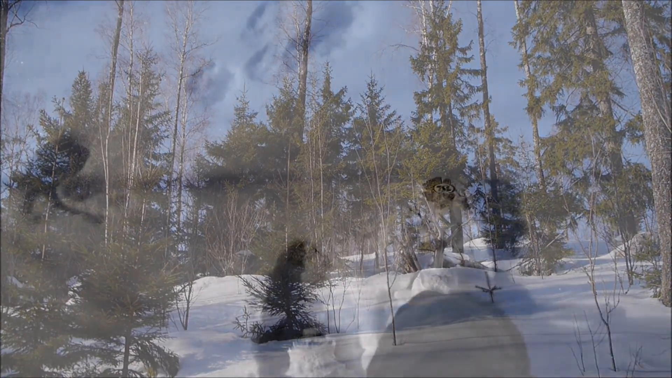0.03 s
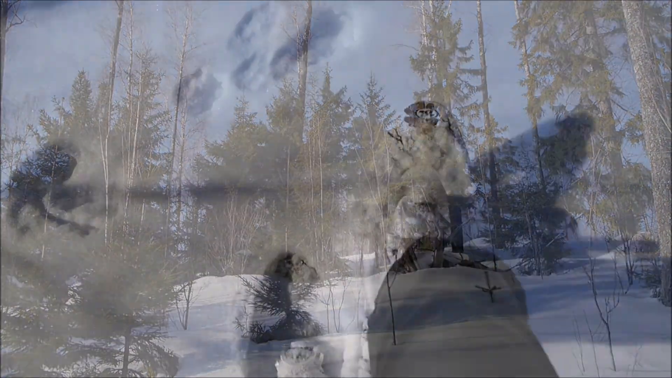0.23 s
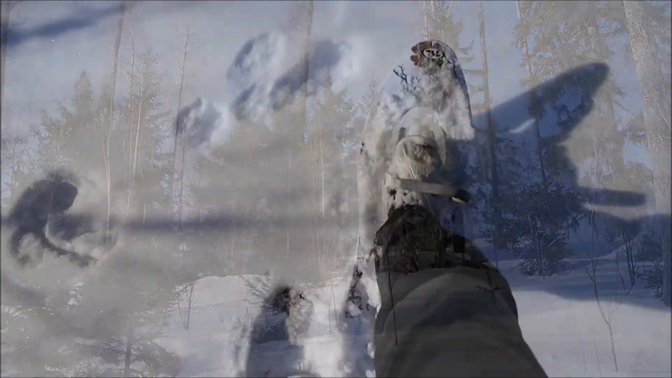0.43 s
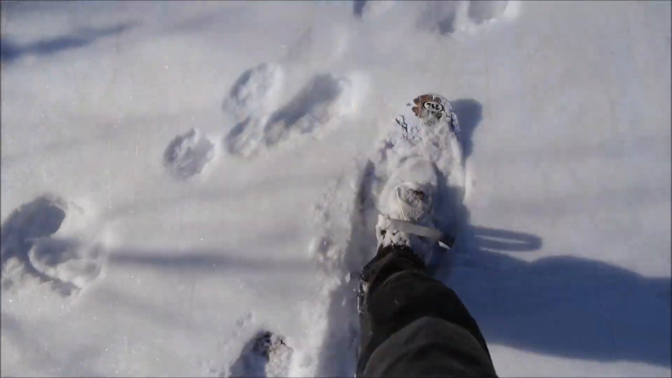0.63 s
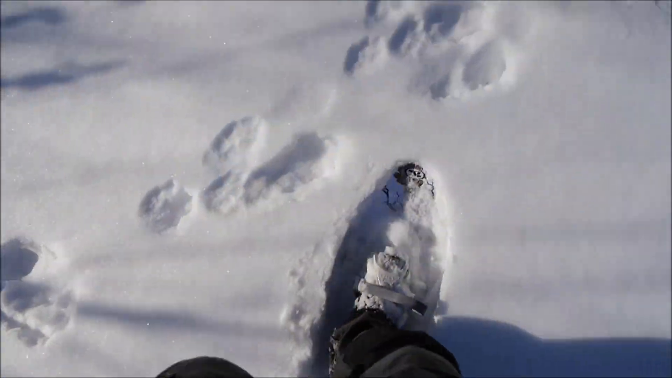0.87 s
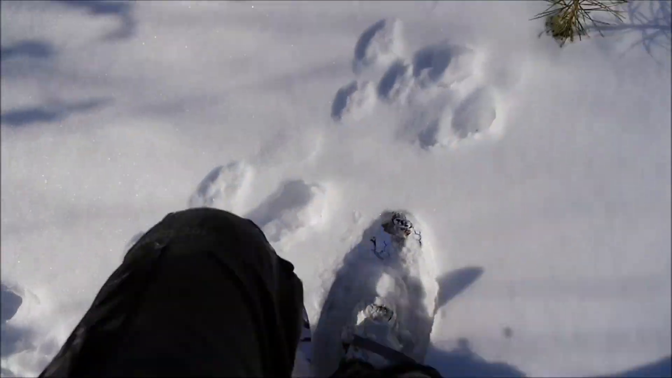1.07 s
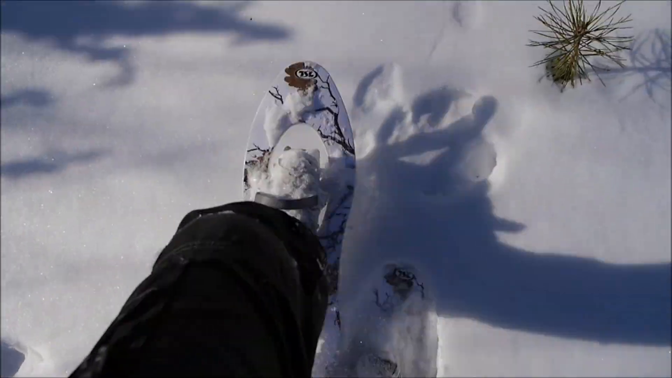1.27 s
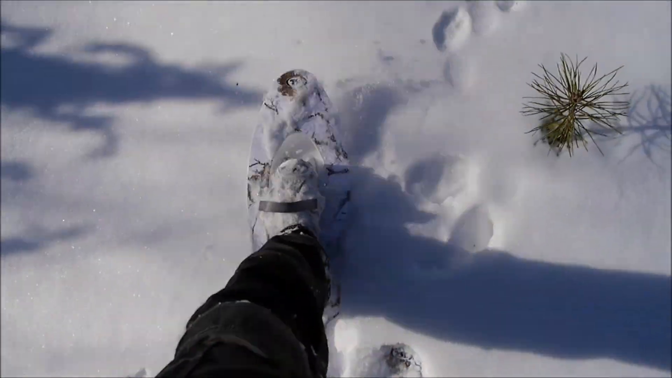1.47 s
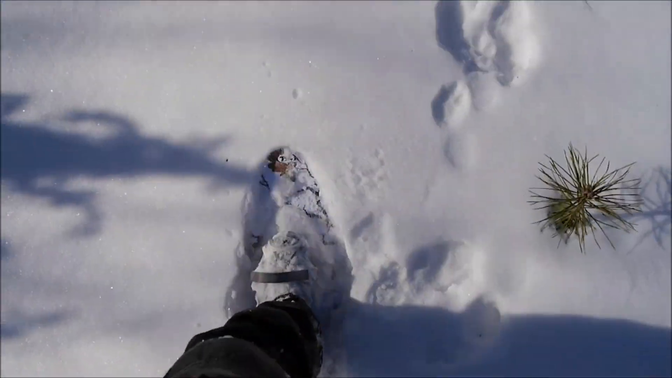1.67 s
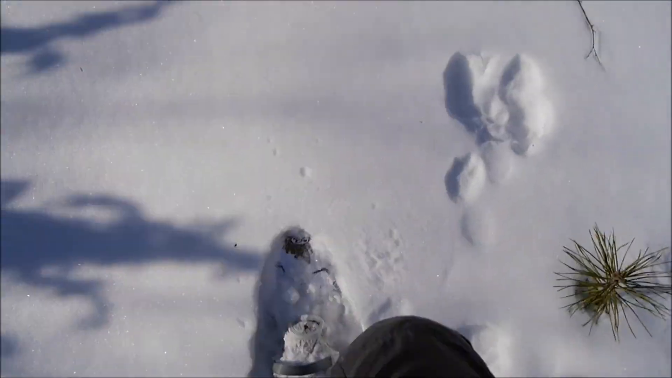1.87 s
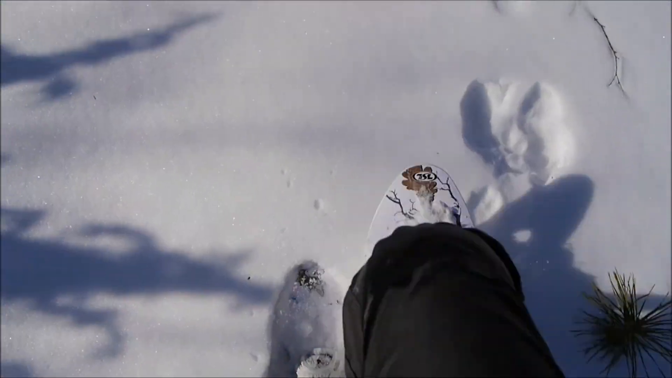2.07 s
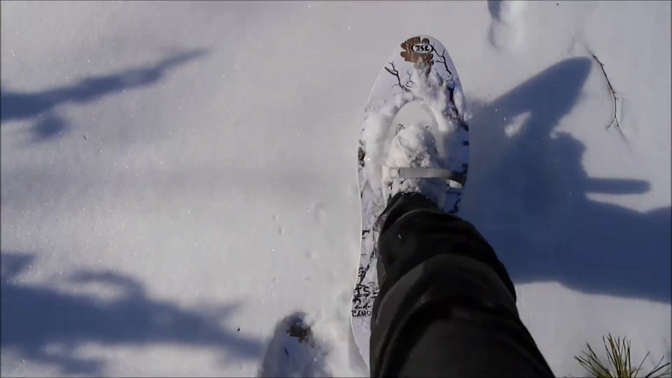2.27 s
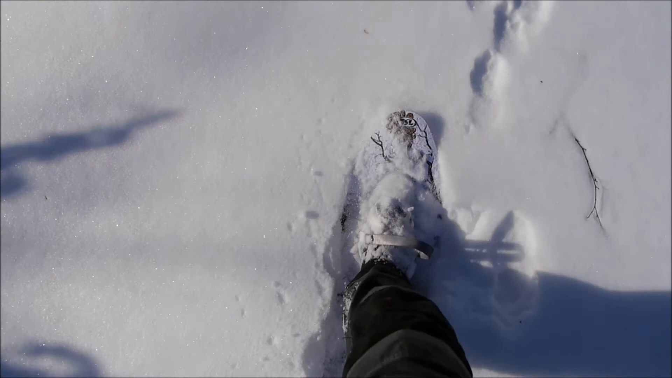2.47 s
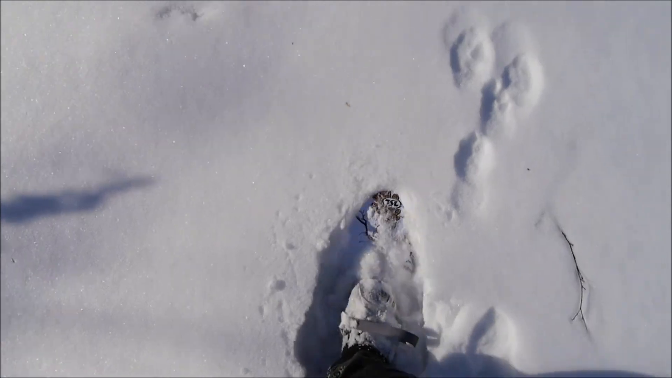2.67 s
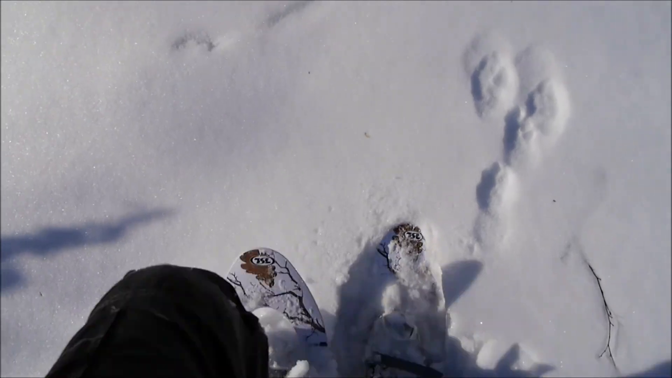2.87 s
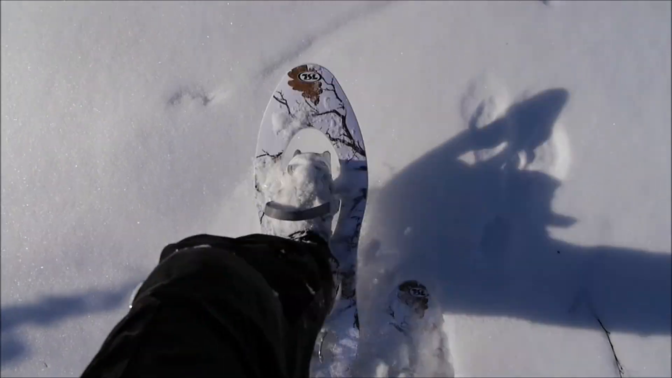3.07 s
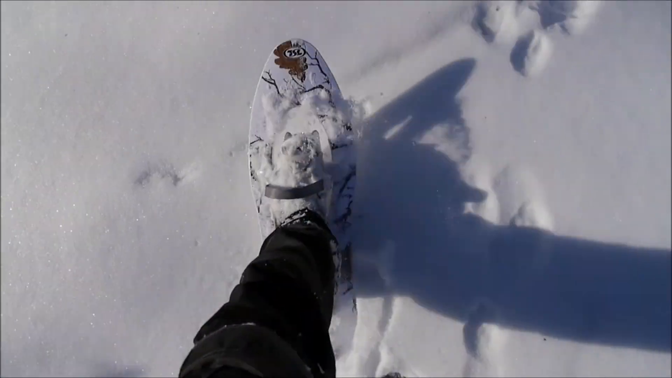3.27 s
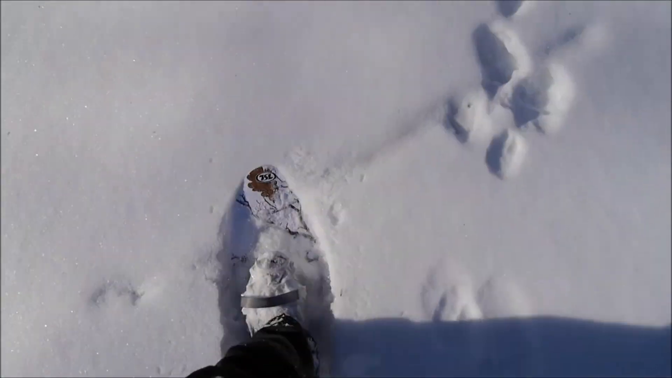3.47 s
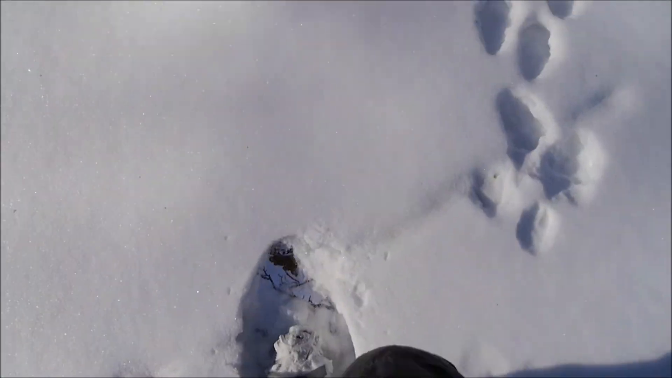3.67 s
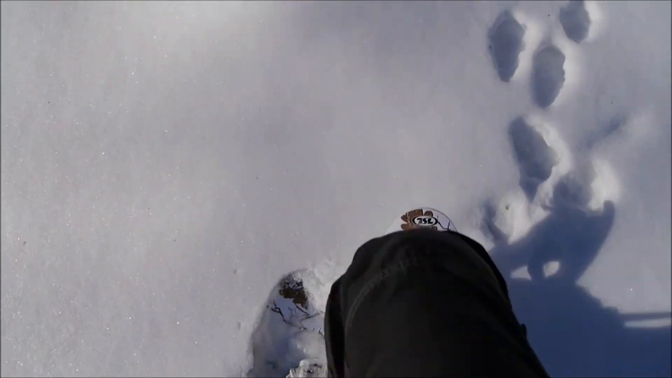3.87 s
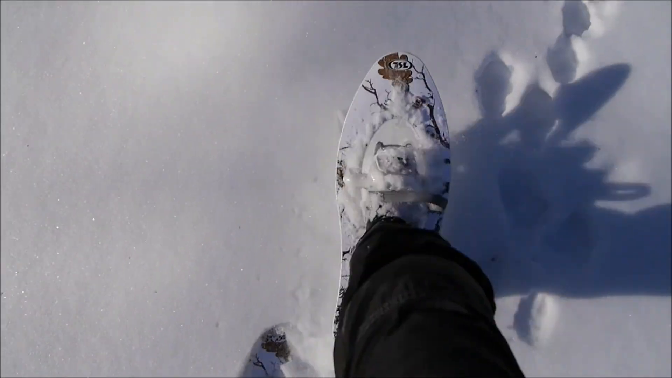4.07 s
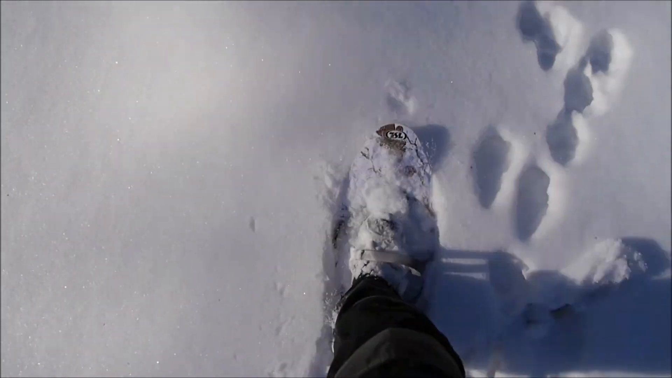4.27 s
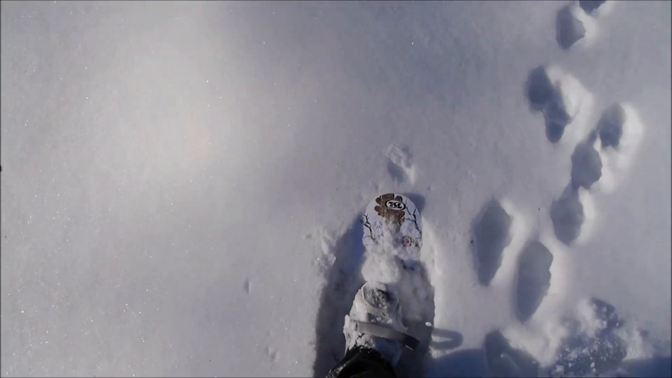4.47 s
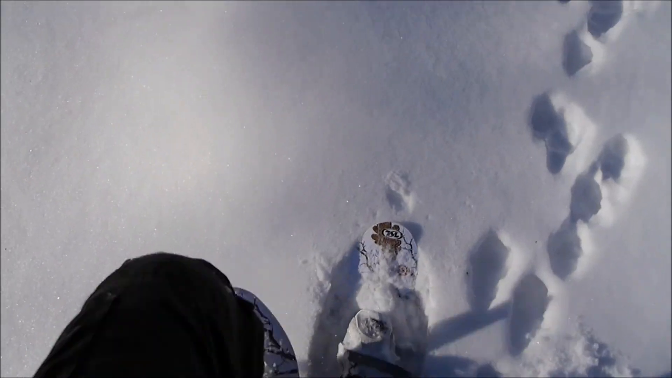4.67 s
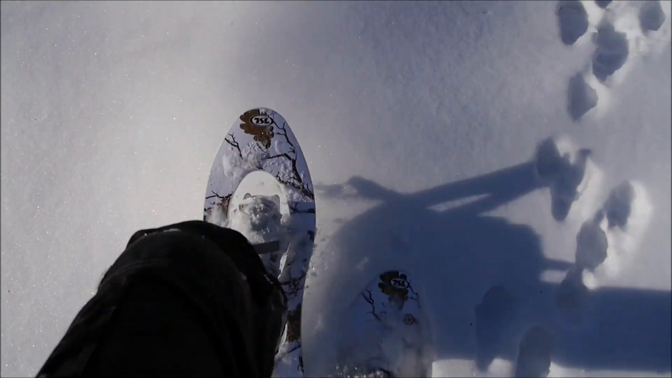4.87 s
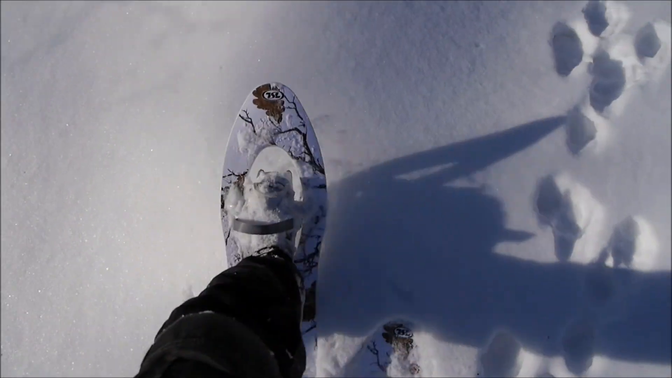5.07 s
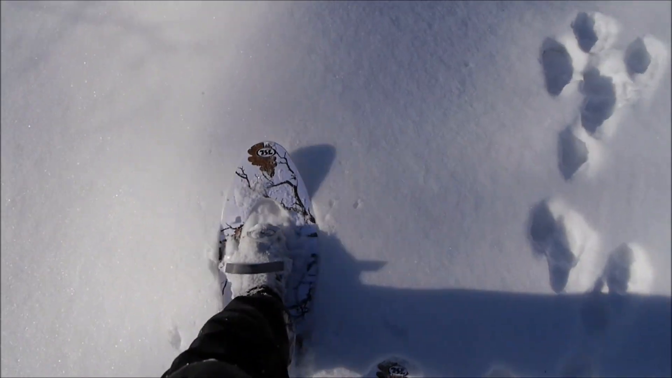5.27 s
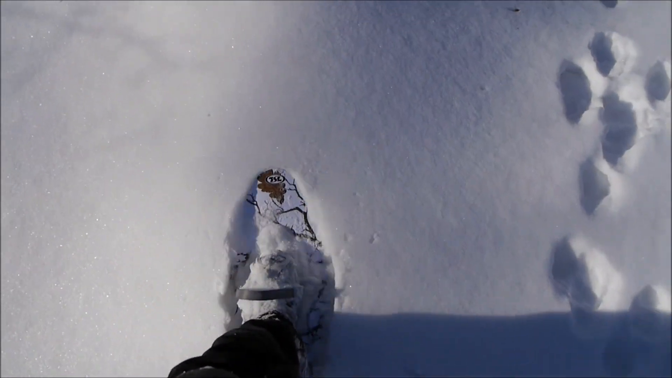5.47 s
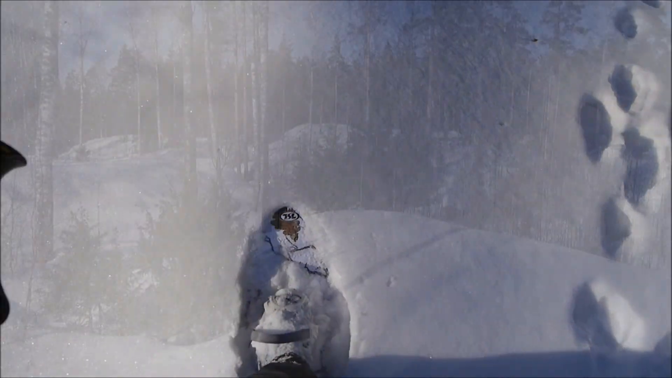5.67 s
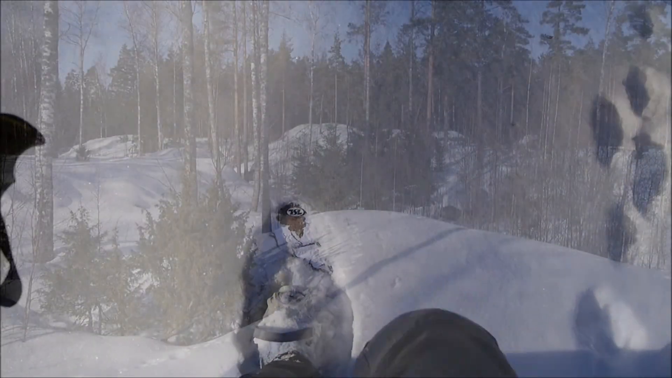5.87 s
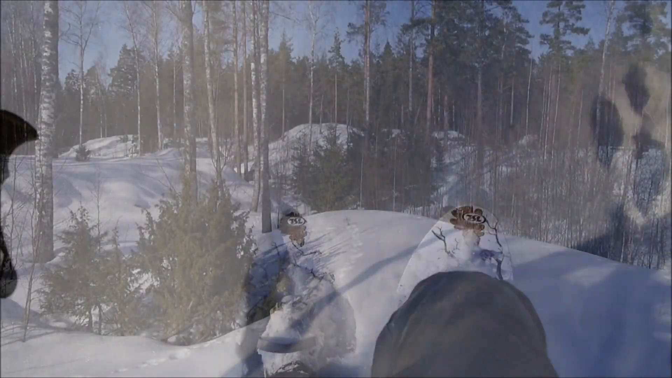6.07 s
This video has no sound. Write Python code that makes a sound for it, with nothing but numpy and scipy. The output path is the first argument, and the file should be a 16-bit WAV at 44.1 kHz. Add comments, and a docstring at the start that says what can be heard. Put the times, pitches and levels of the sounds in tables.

```python
"""Snowshoes walk through cold powder, close by, in a still forest.
Each stride drags the frame through the crust, throws powder, lands and packs the snow with a squeaky
crunch: dense clicks of breaking ice bonds. Pockets of snow give way with dull thumps, plastic decks and
bindings knock, bits of crust snap, straps and cloth rub. Trunks scatter a faint echo; behind it are
an even background hiss and a few low puffs of air stirred by the walk."""
import sys
import numpy as np
from scipy import signal
from scipy.fft import rfft, irfft
from scipy.io import wavfile
from scipy.ndimage import uniform_filter1d

SR = 44100
rng = np.random.default_rng(int(sys.argv[2]) if len(sys.argv) > 2 else 0)


def dump_mix(stems):
    """Bounce the given channels to the path in sys.argv[1] as a 16-bit WAV at rate SR."""
    frames = np.atleast_2d(stems).T  # one column per channel
    limited = np.clip(frames, -1, 1)  # hard clip at full scale
    pcm = np.round(limited * 32767).astype(np.int16)
    wavfile.write(sys.argv[1], SR, pcm)


N = 269451
TIME = np.arange(N) / SR
HZ = np.fft.rfftfreq(N, 1 / SR)


def amp(db):
    """Decibels to gain."""
    return 10 ** (np.asarray(db) / 20)


def unit_rms(x):
    """Scales to rms 1."""
    return x / np.sqrt(np.mean(x ** 2) + 1e-20)


def curve_at(points, hz):
    """Interpolates on a log-frequency axis."""
    f, value = np.transpose(points)
    return np.interp(np.log(hz + 1), np.log(f + 1), value)


def add(mix, start_s, sound):
    """Mixes a sound in at start_s."""
    part = mix[..., round(start_s * SR):][..., :sound.shape[-1]]
    part += sound[..., :part.shape[-1]]


def colour(x, spectrum, tilt_db_oct=0, size=2048):
    """Minimum-phase filter of unit energy: each click gets a sharp front and a short ring."""
    hz = abs(np.fft.fftfreq(size, 1 / SR))
    log_gain = np.log(amp(curve_at(spectrum, hz) + tilt_db_oct * np.log2(1 + hz / 500)))
    ring = np.fft.ifft(np.exp(np.conj(signal.hilbert(log_gain)))).real
    return signal.oaconvolve(x, ring[None] / np.linalg.norm(ring), axes=1)[:, :x.shape[1]]


# landings: t/s, length/s, weight/dB, spray/dB, powder settling/(dB/s), L-R/dB
TREADS = [(0.649, .42, -30.5, -27.5, 31, -4), (1.589, 0.38, -29, -26.5, 30, -0.5),
          (2.471, 0.33, -28.5, -26.5, 28, -4), (3.419, 0.31, -29, -26.5, 16, -0.5),
          (4.282, 0.288, -31, -24, 70, -5), (5.258, 0.58, -32, -30.5, 17, -0.5)]

def treads(pack_db=-5, firming_db_per_s=3.5, crust_db=-0.5, crust_settling_share=0.44):
    """Landing throws crust and powder, which settle while the weight packs the snow beneath."""
    for start_s, length_s, weight_db, spray_db, settling_db_per_s, side_db in TREADS:
        age_s = np.clip(TIME - start_s, 0, length_s)
        load = amp(weight_db) * envelope(start_s, length_s, rise_s=0.068, fall_s=0.026)
        spray = amp(spray_db) * envelope(start_s, length_s, rise_s=0.029, fall_s=0.026)
        settled_db = settling_db_per_s * age_s
        packing = load * amp(pack_db + firming_db_per_s * age_s)
        scrape = spray * amp(crust_db - crust_settling_share * settled_db)
        yield np.array([packing, load, scrape, spray * amp(-settled_db)]), side_db


# frame drags: t/s, length/s, scrape/dB, swell over the length/dB, powder re scrape/dB, L-R/dB
DRAGS = [(0.542, .13, -30.5, 8, -7, -5.5), (1.164, 0.14, -35, -1, -6, -1),
         (1.358, 0.069, -32, 9.5, -5.5, -3), (1.412, 0.27, -27, -0.5, -6, -1),
         (1.991, 0.21, -35, 5, -9.5, -4.5), (2.255, 0.21, -26.5, 2.5, -9, -5),
         (2.822, 0.076, -42, 13, -6, 2), (2.921, 0.16, -30.5, 4, -4.5, -2), (3.184, 0.24, -30, 6, -4, -2.5),
         (3.73, 0.19, -37, 3, -7, -5.5), (3.9, 0.12, -34, 1, -13, -5), (4.079, 0.21, -30.5, 1.5, -6.5, -3),
         (4.779, 0.13, -30.5, -3, -5.5, -1), (5.068, 0.2, -33.5, -8, -4.5, -1.5),
         (5.221, 0.23, -31, -2, -21, 1), (5.86, 0.063, -35, -1.5, -4, -4.5),
         (5.997, 0.036, -38.5, 0, -25, -6)]

def drags(pack_db=-12, crunch_db=-5.5):
    """The unloaded frame mostly scrapes; the level follows the foot's speed."""
    for start_s, length_s, db, swell_db, powder_db, side_db in DRAGS:
        progress = np.clip((TIME - start_s) / length_s, 0, 1)
        speed = amp(db + swell_db * (progress - 0.5))
        speed *= envelope(start_s, length_s, rise_s=0.034, fall_s=0.022)
        yield np.outer(amp([pack_db, crunch_db, 0, powder_db]), speed), side_db


# weight shifts onto a deck: t/s, length/s, crunch/dB, spray re crunch/dB, L-R/dB
SHIFTS = [(0.826, 0.012, -31, -24, -1), (1.246, 0.041, -39, 4.5, -2), (1.502, .035, -33, -8, -1),
          (2.528, 0.044, -29, 2.5, -7), (2.905, 0.062, -32.5, -7, -3), (3.004, 0.017, -27, -4, -3),
          (3.121, 0.04, -35, -1, -4), (3.495, 0.047, -28, -5.5, 6), (4.229, 0.019, -24.5, -3.5, -5),
          (4.585, 0.046, -33, -4, 1), (4.7, 0.035, -39.5, -3, 1), (4.826, 0.024, -28.5, -3, -1),
          (4.926, 0.053, -33, -0.5, -4), (5.009, 0.05, -32.5, -2.5, -4.5), (5.41, 0.051, -31.5, -6.5, 8),
          (5.54, 0.025, -43.5, 10, 3)]

def shifts(pack_db=-4.5, crust_db=1.5):
    """A short push packs the snow and squeezes a little out at the sides."""
    for start_s, length_s, db, spray_db, side_db in SHIFTS:
        push = amp(db) * envelope(start_s, length_s, rise_s=0.016, fall_s=0.015)
        yield np.outer(amp([pack_db, 0, spray_db + crust_db, spray_db]), push), side_db


def envelope(start_s, length_s, rise_s, fall_s):
    """Linear attack, hold, exponential release."""
    attack = np.clip((TIME - start_s) / rise_s, 0, 1)
    return attack * np.exp(-np.maximum(TIME - start_s - length_s, 0) / fall_s)


def gait(trickle_db=(-50, -50, -44.5, -49)):
    """Sums moves and trickling loose snow into packing, crunch, scrape, powder levels and L-R, in dB."""
    power = np.outer(amp(trickle_db) ** 2, np.ones(N))
    lean = np.zeros(N)
    for moves in (treads(), drags(), shifts()):
        for gains, side_db in moves:
            power += gains ** 2
            lean += side_db * (gains[2:] ** 2).sum(0)  # weighted by scrape and powder
    return 10 * np.log10(power), lean / power[2:].sum(0)


# spectra of four fracture sizes, coarse to fine, and of the shuddering snowpack: f/Hz, level/dB
PACKING_SPECTRUM = [(20, -50), (50, -23), (90, -24.5), (150, -8), (220, 3), (350, 7.5), (480, 6),
                    (650, -2.5), (1200, -45.5), (4000, -91)]
CRUNCH_SPECTRUM = [(150, -48), (400, -9), (600, 3), (780, 8.5), (950, 4), (1300, 1), (1800, -4.5),
                   (3000, -26), (9000, -27)]
SCRAPE_SPECTRUM = [(300, -53), (900, -4), (1600, 2), (2200, 0.5), (2800, 1), (4000, -1.5), (5200, -7),
                   (7000, -11.5), (15000, -56)]
POWDER_SPECTRUM = [(1500, -30), (4500, 3.5), (6500, 2.5), (8500, 3), (11000, 1.5), (13000, -2),
                   (16000, -11)]
SHUDDER_SPECTRUM = [(15, -16), (35, -43), (60, -15.5), (90, -2), (130, 3), (220, -28), (600, -58)]

def snow(levels_db, shudder_db=-21, shudder_growth=1.36, firm_db=-32, fine_jerk_db=1.5):
    """Four sizes of fracture follow the stride and share its jerks; firm treads shake the deep layers."""
    packing_db, crunch_db, scrape_db, powder_db = levels_db
    jerks = give_way()
    packing = colour(fractures(per_s=260, spread_db=2.0, bed=0.8), PACKING_SPECTRUM)
    crunch = colour(fractures(per_s=420, spread_db=0.5, bed=1.0), CRUNCH_SPECTRUM)
    scrape = colour(fractures(per_s=1500, spread_db=-0.5, bed=1.0), SCRAPE_SPECTRUM)
    powder = colour(fractures(per_s=4600, spread_db=3.5, bed=0.67), POWDER_SPECTRUM)
    shudder = colour(rng.standard_normal((2, N)), SHUDDER_SPECTRUM, size=8192)
    packing *= amp(packing_db + jerks)
    crunch *= amp(crunch_db + jerks)
    scrape *= amp(scrape_db + fine_jerk_db * jerks)
    powder *= amp(powder_db + fine_jerk_db * jerks)
    shudder *= amp(firm_db + shudder_db + shudder_growth * (packing_db - firm_db))
    walking = TIME > SCUFFS[0][0]  # from the first break of the crust
    return walking * (packing + shudder + clumps(crunch + scrape + powder))


def fractures(per_s, spread_db, bed):
    """Mid and side trains of breaking ice bonds of uneven size, over a bed of countless tiny ones."""
    size = amp(spread_db * np.minimum(rng.exponential(1, (2, N)), 3.5))
    polarity = rng.choice([-1, 1], (2, N))
    clicks = size * polarity * (rng.random((2, N)) < per_s / SR)
    return unit_rms(unit_rms(clicks) + bed * rng.standard_normal((2, N)))


def give_way(per_s=70, relax_s=0.02):
    """Snow holds, yields at once, then settles: sudden rises, slower falls; mean 0, rms 1."""
    breaks = rng.uniform(0.34, 1, N) * (rng.random(N) < per_s / SR)
    energy = signal.lfilter([1], [1, -np.exp(-2 / (relax_s * SR))], breaks)
    strain = np.sqrt(energy + 0.01)
    return unit_rms(strain - strain.mean())


def clumps(x, patchy_db=1.5):
    """Each clump of snow has its own size, so it favours its own pitches for some 20 ms."""
    frames = signal.stft(x, nperseg=512, noverlap=384)[2]
    patches = uniform_filter1d(rng.standard_normal(frames.shape[1:]), size=5, axis=0)
    patches = uniform_filter1d(patches, size=7, axis=1)
    gain = unit_rms(amp(patchy_db * unit_rms(patches)))
    return signal.istft(frames * gain, nperseg=512, noverlap=384)[1][:, :N]


# frame breaking the crust: t/s, length/s, level/dB, tilt/(dB/oct)
SCUFFS = [(0.5581, 0.022, -22.5, -1.5), (1.263, 0.021, -25, -5), (1.608, 0.019, -23.5, 6.5),
          (2.513, 0.018, -22, -2), (2.906, 0.013, -27, -1), (3.15, 0.011, -34, -7),
          (3.206, 0.018, -25.5, 1.5), (3.44, 0.0053, -14.5, -3), (3.469, 0.0087, -19, 1),
          (3.69, 0.024, -21.5, 6.5), (4.239, 0.019, -24, -2), (4.298, 0.034, -23, -3.5),
          (4.61, .018, -42, 3), (4.795, 0.015, -26.5, -0.5), (4.86, 0.017, -26, 2.5),
          (5.933, 0.013, -29, -6.5)]
# spectrum of the break: f/Hz, level/dB
SCUFF_SPECTRUM = [(30, -36), (100, -25), (300, -2.5), (900, 4.5), (1800, 3.5), (3100, 9), (5000, 5.5),
                  (7500, -2), (11000, -3), (16000, -32)]

def scuffs(rise_s=0.0018, fall_s=0.0043):
    """The crust breaks in a rush of fractures that stops within milliseconds."""
    out, t = np.zeros((2, N)), TIME[:SR // 10]
    grains = fractures(per_s=1600, spread_db=-1.0, bed=0.26)
    for start_s, length_s, db, tilt_db_oct in SCUFFS:
        gate = np.minimum(t / rise_s, 1) * np.exp(-np.maximum(t - length_s, 0) / fall_s)
        first = round(start_s * SR)
        rush = grains[:, first:first + len(t)] * gate
        add(out, start_s, amp(db) * colour(rush, SCUFF_SPECTRUM, tilt_db_oct))
    return out


# collapsing snow pockets: peak t/s, level/dB, f/Hz
THUMPS = [(0.817, -18.5, 227), (1.122, -24.5, 480), (1.2667, -22.5, 278), (1.7071, -12, 405),
          (1.788, -12, 226), (1.96, -27, 334), (2.5853, -18.5, 227), (2.91, -21, 360), (3.158, -26, 280),
          (3.499, -15.5, 476), (3.534, -26, 189), (4.2436, -23, 310), (4.7318, -24, 424),
          (4.8213, -21, 300), (5.5442, -24, 234), (5.7732, -23, 302)]

def thumps(rise_cycles=0.63, fall_cycles=0.85):
    """A pocket collapses: the deck drops and the snow damps it within two or three swings."""
    out, t = np.zeros((2, N)), TIME[:SR // 10] - 0.02
    for peak_s, db, hz in THUMPS:
        cycles = t * hz
        swell = np.exp(-(cycles / np.where(cycles < 0, rise_cycles, fall_cycles)) ** 2)
        add(out[0], peak_s + t[0], -amp(db) * swell * np.cos(2 * np.pi * cycles))
    return out


# deck and binding knocks: t/s, level/dB, f/Hz
KNOCKS = [(1.1214, -23, 1190), (1.16, -24, 616), (1.218, -27, 804), (1.2358, -24, 1740), (1.342, -29, 830),
          (1.373, -18, 1470), (1.7888, -17.5, 880), (2.214, -19, 2200), (2.267, -14.5, 2350),
          (2.309, -17.5, 890), (2.34, -12, 1530), (2.3869, -19, 1000), (2.4326, -16, 1150),
          (2.517, -12, 1610), (2.5853, -18, 1140), (2.911, -21, 990), (3.6248, -15, 1100),
          (4.1428, -7, 1530), (4.217, -15, 1500), (5.3002, -14.5, 1030), (5.35, -13, 1600),
          (5.388, -16, 1260), (5.9365, -21.5, 1130)]

def knocks(ring_cycles=2.2, body_ratio=0.535, body_db=-11, rattle=0.28, low_cut_hz=380):
    """Snow-damped plastic rings briefly over a lower swing of the deck, too thin to radiate bass."""
    out, t = np.zeros((2, N)), TIME[:SR // 25]
    for start_s, db, hz in KNOCKS:
        cycles = t * hz
        fade = np.minimum(2 * cycles, 1) * np.exp(-(cycles / ring_cycles) ** 2 / 2)
        ring = np.sin(2 * np.pi * cycles) + amp(body_db) * np.sin(2 * np.pi * cycles * body_ratio)
        grit = unit_rms(uniform_filter1d(rng.standard_normal(len(t)), size=8))
        add(out[0], start_s, amp(db) * fade * (ring + rattle * grit))
    return signal.sosfilt(signal.butter(2, low_cut_hz, "high", fs=SR, output="sos"), out)


# snapping bits of crust: t/s, level/dB
SNAPS = [(0.6842, -14), (0.7066, -13), (1.5637, -25), (1.6185, -16), (2.5198, -5), (2.5854, -6),
         (3.4417, -6), (3.4622, -7), (3.6588, -8), (3.6743, -12), (3.7105, -16), (4.3091, -7),
         (4.4331, -6.5), (4.8195, -10.5), (5.1187, -14), (5.2998, -19)]
# spectrum of a snap: f/Hz, level/dB
SNAP_SPECTRUM = [(60, -35), (200, 12), (1000, 9), (3500, 13.5), (7000, 9), (11000, 1), (16000, -24)]

def snaps(decay_s=0.0012, width=0.5):
    """One sharp break, then a millisecond of splinters."""
    out, t = np.zeros((2, N)), TIME[:SR // 50]
    for start_s, db in SNAPS:
        crack = 0.5 * rng.standard_normal((2, len(t))) * np.exp(-t / decay_s)
        crack[0, 0] += 1
        crack[1] *= width
        crack = colour(crack, SNAP_SPECTRUM)
        add(out, start_s, amp(db) * crack / abs(crack[0]).max())
    return out


# rubbing straps and trouser cloth: t/s, length/s, level/dB, f/Hz
RASPS = [(0.668, 0.033, -30, 3300), (1.138, 0.0088, -35, 3050), (1.23, 0.025, -31.5, 1850),
         (1.515, 0.043, -28.5, 2060), (3.055, 0.024, -27, 4670), (3.091, 0.012, -28, 5500),
         (3.207, 0.021, -23.5, 2800), (3.275, 0.1, -32, 2830), (4.105, 0.11, -34.5, 2700),
         (4.294, .014, -26, 3140), (4.81, 0.017, -34, 3020), (4.777, 0.14, -33, 4760),
         (5.087, 0.11, -33, 2830), (5.284, .03, -34, 3920), (5.327, 0.026, -32.5, 10700)]

def rasps(q=6, fade_share=0.22):
    """Stick-slip excites one broad resonance of the rubbed part."""
    out = np.zeros((2, N))
    slips = fractures(per_s=600, spread_db=1.5, bed=0.6)
    for start_s, length_s, db, hz in RASPS:
        drive = slips[:, round(start_s * SR):round((start_s + length_s) * SR)]
        rub = signal.lfilter(*signal.iirpeak(hz, q, SR), drive)
        rub = signal.lfilter(*signal.iirpeak(hz, 1, SR), rub)
        add(out, start_s, amp(db) * unit_rms(rub) * signal.windows.tukey(rub.shape[1], fade_share))
    return out


# stereo likeness of the steps: f/Hz, L-R correlation at equal mid and side input
CORRELATION = [(40, 0.98), (160, 0.99), (300, .997), (700, 1), (1400, 1), (2800, 0.86), (5500, 0.7),
               (14000, 0.52)]

def spread(mid_side):
    """Mid/side to left/right, wider in the treble."""
    correlation = curve_at(CORRELATION, HZ)
    mid, side = rfft(mid_side)
    side *= np.sqrt((1 - correlation) / (1 + correlation))
    return irfft(np.array([mid + side, mid - side]), N)


# steady balance of the steps: f/Hz, L-R/dB
BALANCE = [(700, -0.079), (1300, -0.1), (2400, -1.8), (4400, -0.077), (8000, 0.1), (15000, 1.5)]
# phase lead of the left channel: f/Hz, lead/rad
PHASE_LEAD = [(700, 0), (2200, 0.42), (3500, 0.79), (5000, 0.68), (14000, 0.22)]

def place(stereo, foot_db, crossover_hz=1300):
    """The treble leans to the side of the working foot; the bass stays in the middle."""
    sides = np.array([[0.5], [-0.5]])
    spectrum = rfft(stereo) * amp(sides * curve_at(BALANCE, HZ))
    spectrum *= np.exp(1j * sides * curve_at(PHASE_LEAD, HZ))
    treble = irfft(spectrum * HZ ** 2 / (HZ ** 2 + crossover_hz ** 2), N)
    return irfft(spectrum, N) + treble * (amp(sides * foot_db) - 1)


def trees(x, echo_db=-15, t60_s=1.0, build_s=0.015, low_cut_hz=1200):
    """Trunks scatter a little treble back, differently to each side."""
    t = TIME[:SR]
    tail = rng.standard_normal((2, SR)) * amp(-60 * t / t60_s) * (1 - np.exp(-(t / build_s) ** 2))
    high_pass = signal.butter(1, low_cut_hz, "high", fs=SR, output="sos")
    tail = signal.sosfilt(high_pass, tail / np.linalg.norm(tail[0]))
    return amp(echo_db) * signal.fftconvolve(x.mean(0)[None], tail, axes=1)[:, :N]


# air puffs: t/s, length/s, left level/dB
PUFFS = [(0.76, .11, -48), (1.8, 0.051, -51), (2.6, 0.066, -35), (3.5, 0.085, -42)]

def puffs(band_hz=(62, 190), right_gain=-0.29):
    """Air stirred by the walk pushes on one microphone port and pulls on the other: a low rumble."""
    out = np.zeros((2, N))
    band_pass = signal.butter(3, band_hz, "band", fs=SR, output="sos")
    rumble = signal.sosfilt(band_pass, rng.standard_normal(N))
    for start_s, length_s, db in PUFFS:
        gust = rumble[round(start_s * SR):round((start_s + length_s) * SR)]
        gust = amp(db) * unit_rms(gust * np.hanning(len(gust)))
        add(out, start_s, np.outer([1, right_gain], gust))
    return out


# background hiss spectra, mid and side: f/Hz, level/dB
HISS_MID_SPECTRUM = [(18, -55), (30, -26), (87, -24), (211, -6.5), (511, -1.5), (1870, -11), (2130, -8),
                     (2630, -12.5), (15000, -28)]
HISS_SIDE_SPECTRUM = [(18, -63), (30, -31), (167, -15), (200, -16), (240, -13), (415, -6.5), (837, -3),
                      (15000, -29)]

def background_hiss(mid_db=-58, side_db=-52):
    """Faint, even background hiss, far wider than the steps."""
    mid = amp(mid_db) * colour(rng.standard_normal((1, N)), HISS_MID_SPECTRUM)
    side = amp(side_db) * colour(rng.standard_normal((1, N)), HISS_SIDE_SPECTRUM)
    return np.vstack([mid + side, mid - side])


def scene():
    """Close, nearly dry steps in a quiet forest, over a wide hiss."""
    levels_db, foot_db = gait()
    mid_side = snow(levels_db) + scuffs() + rasps() + thumps() + knocks() + snaps()
    steps = place(spread(mid_side), foot_db)
    return steps + trees(steps) + background_hiss() + puffs()


def record(dry):
    """Steep low-pass at the top of the treble."""
    cutoff_hz = 15950
    low_pass = signal.firwin(511, cutoff_hz, window=("kaiser", 9), fs=SR)
    return signal.oaconvolve(dry, low_pass[None], "same", axes=1)


dry = scene()
out = record(dry)
dump_mix(out)
```